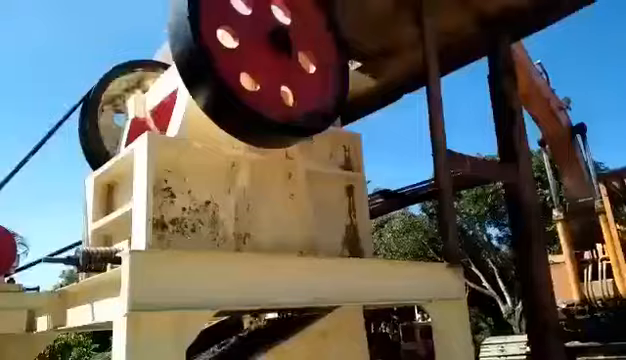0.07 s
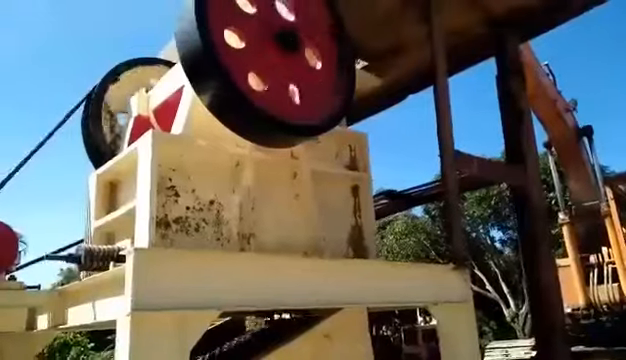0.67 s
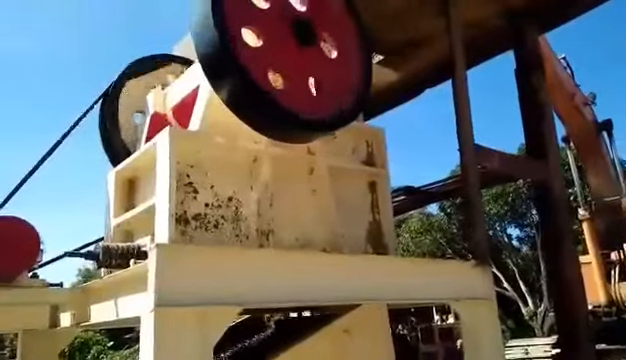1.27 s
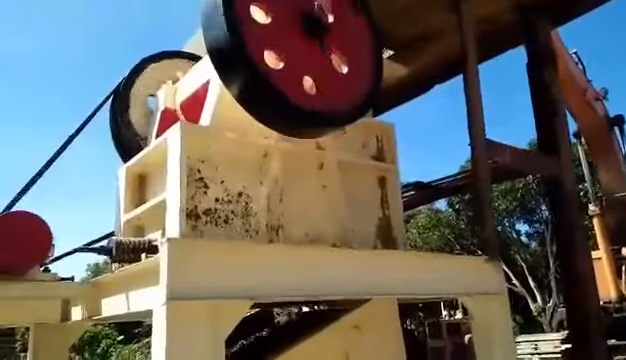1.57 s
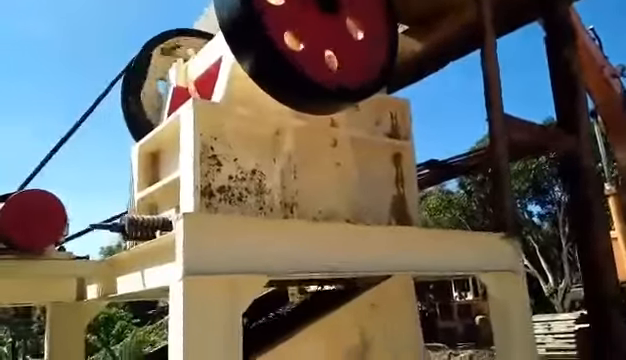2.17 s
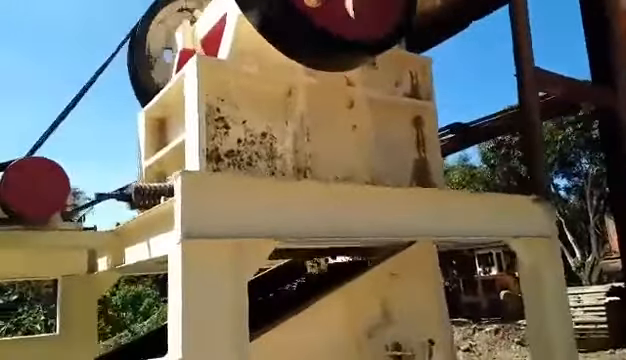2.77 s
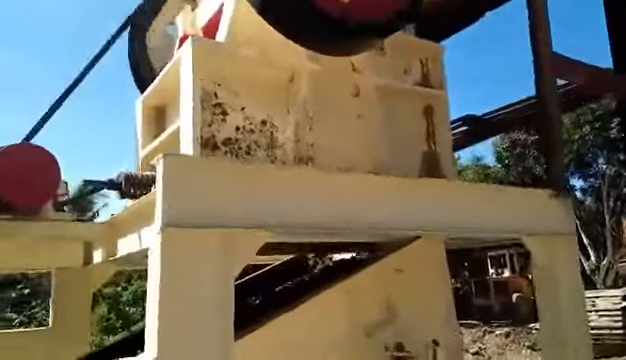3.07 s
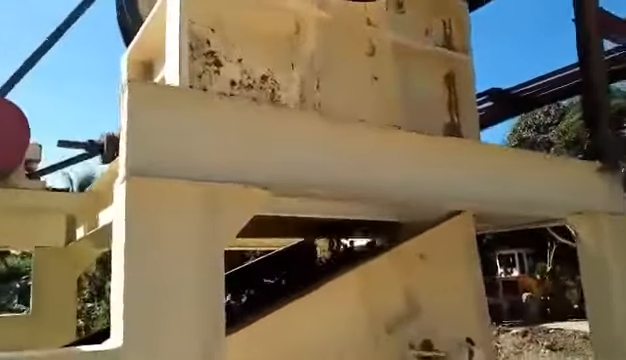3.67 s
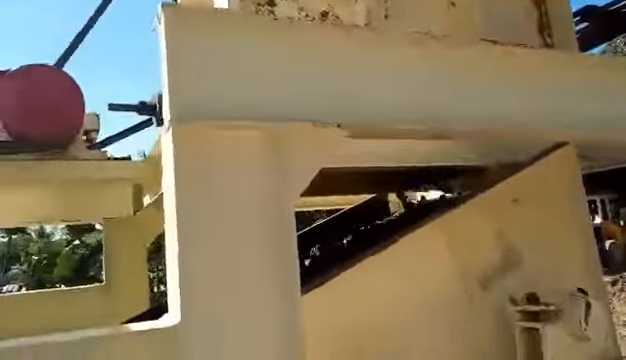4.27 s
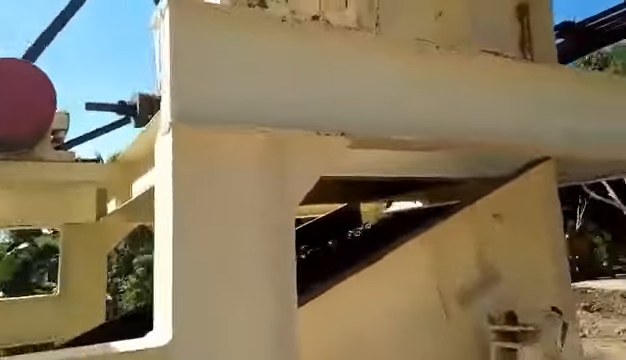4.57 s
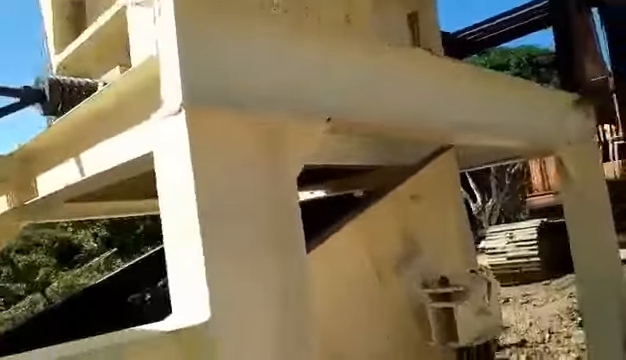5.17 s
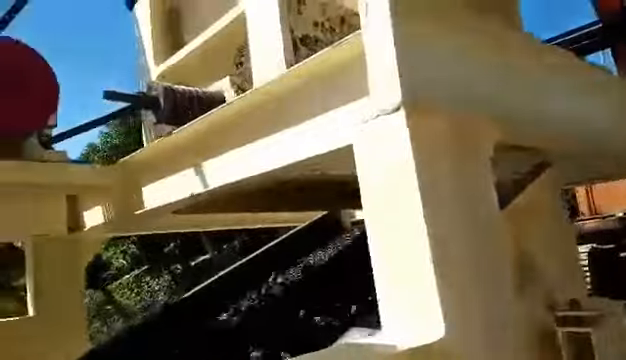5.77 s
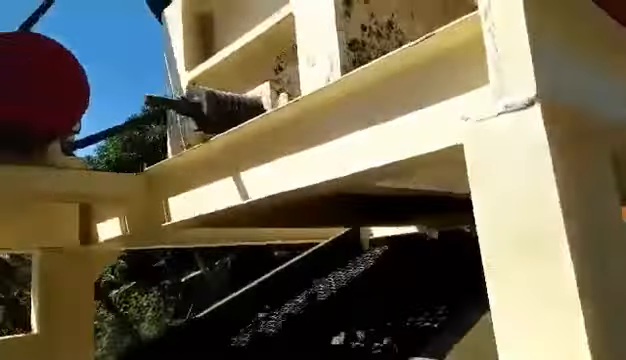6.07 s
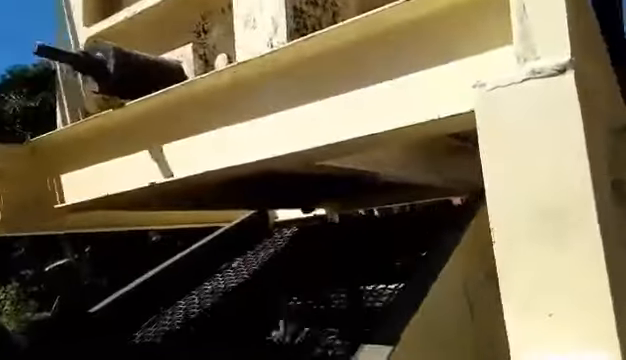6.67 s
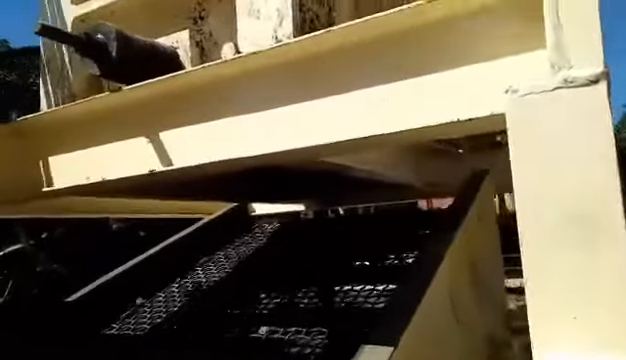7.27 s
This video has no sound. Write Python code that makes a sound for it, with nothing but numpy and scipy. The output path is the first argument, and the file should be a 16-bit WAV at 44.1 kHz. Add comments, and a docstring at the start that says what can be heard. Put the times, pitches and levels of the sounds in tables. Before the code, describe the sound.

A diesel rock crusher thuds and knocks rapidly outdoors, grinding stone as gravel hisses and clatters ever closer on a wire screen.

```python
"""A jaw crusher pounds away outdoors, driven at nineteen beats a second by what sounds like a
one-cylinder diesel. Each beat is an exhaust thud and a metallic knock that shakes the steel frame.
Rock grinds between the jaws, and gravel hisses over the wire screen below. The clatter of stones
grows as the microphone slowly approaches the screen."""
import sys
import numpy as np
from scipy import signal
from scipy.fft import rfft, irfft
from scipy.io import wavfile
from scipy.ndimage import uniform_filter1d, minimum_filter1d

SR = 44100
rng = np.random.default_rng(int(sys.argv[2]) if len(sys.argv) > 2 else 0)


def digitize_waveform(pressure):
    """Quantize a signal to 16-bit integers and store it at the path in sys.argv[1].

    Rows of a 2-D input are taken as channels; values are limited to [-1, 1].
    """
    field = np.atleast_2d(pressure).T
    bounded = np.clip(field, -1, 1)
    quanta = np.round(bounded * 32767).astype(np.int16)
    wavfile.write(sys.argv[1], SR, quanta)


N = 332073
TIME = np.arange(N) / SR
FIRST_BEAT_S, START_S = .7081, .773   # the engine is already running when the microphone opens

# Modes of the exhaust pipe and silencer: the first two boom, the last one barks.
# Each row: pitch in Hz, width in Hz, relative level in dB.
PIPE = [(87.3, 1.9, 0.5), (136.2, 2.4, -14), (160.7, 11.4, -1.5), (184, 20.3, -5.5), (237.6, 60.6, -4),
        (320, 18.3, 2), (455.3, 4.8, 4.5)]
# Engine speed. Each row: time in seconds, beats per second.
SPEED = [(.76, 19.05), (2.5, 19.01), (5.8, 19.08), (7.6, 19.05)]
BEAT = np.cumsum(np.interp(TIME, *np.transpose(SPEED)) * (TIME > FIRST_BEAT_S)) / SR   # beats so far


def exhaust(bark_gain):
    """The thud: one soft puff a beat rings the pipe and echoes off the plant."""
    # Polarity of each pipe mode, +1 or -1.
    signs = [-1, -1, -1, -1, -1, 1, -1]
    # Slaps off the plant. Each row: delay in seconds, share of the thud that returns.
    echoes = [(0.01, 0.14), (0.0143, 0.71)]
    puffs = cut(beat_clicks(0, uneven_db=.4), 532, "low", order=4)
    modes = [sign * from_db(db) * resonate(puffs, hz, width)
             for (hz, width, db), sign in zip(PIPE, signs)]
    under_frame = np.interp(TIME, (4, 6), [0, 1])   # the microphone moves in from 4 to 6 s
    boom = from_db(4 + 4.5 * under_frame) * sum(modes[:2])
    middle = sum(modes[2:-1])
    hollow = resonate(middle, 257, 66)   # the space under the frame rings; the direct thud is shaded
    body = boom + middle * from_db(-4.5 * under_frame) + from_db(-1) * under_frame * hollow
    bark = from_db(11.5) * bark_gain * modes[-1]
    thud = (from_db(-18) * body + bark) / np.std(sum(modes))
    return thud + sum(share * np.interp(TIME - delay, TIME, thud) for delay, share in echoes)


def knock():
    """About half a beat after each puff, a burr of contacts raps the block, then a rebound follows."""
    # The blows of one knock. Each row: delay after the puff in seconds, pitch in Hz, width in Hz,
    # relative level in dB.
    raps = [(.0308, 1860, 204, -0.5), (.0295, 1220, 430, -7), (.0378, 1700, 430, -6)]
    out = 0
    for delay, hz, width, db in raps:
        blows = beat_clicks(delay, uneven_db=1)
        burr = die_away(blows, decay_s=.004) * repeating_contacts(memory=.65)
        ring = resonate(resonate(blows + .09 * burr, hz, width), hz, width)
        out = out + from_db(db) * rms_one(ring)
    return out


def frame_and_jaws(rattle_gain, grind_gain):
    """Contacts, grit and ringing lumps excite the steel: the highs rattle in time, the lows grind on."""
    # Tone of the steel. Each row: frequency in Hz, spectral level in dB.
    steel_tone = [(310, -32), (520, -17), (572, 2.5), (677, 0.5), (745, 4), (819, 3), (999, 6), (1090, 2),
                  (1250, 7), (1450, 6), (1850, 6.5), (2090, -1.5), (2300, -6), (2530, -27), (3000, -23),
                  (3900, -63), (6600, -120)]
    lumps = pings(low_hz=700, high_hz=1900, per_s=170, ring_s=.014, limit=2000)
    grit = grains(2200, spread_db=1)
    steel = colour(1.1 * repeating_contacts(memory=.93) + grit, steel_tone) + .5 * lumps
    shake = shaking(delay_s=.0343, decay_s=.005, rest=.62)
    rattle = rms_one(cut(steel, 1175, "high", order=3)) * shake
    grind = rms_one(cut(steel, 900, "low", order=3))
    return rattle_gain * rattle + grind_gain * grind


def plates():
    """Now and then a stone drags on a plate, pushed along by each beat, and makes it sing."""
    # Scrapes on plates and edges. Each row: peak time in seconds, pitch in Hz, width in Hz,
    # relative level in dB, half-length in seconds.
    scrapes = [(0.814, 1350, 310, -16.5, .06), (0.824, 6330, 700, -34, 0.11),
               (1.28, 5450, 300, -42.5, 0.26), (1.676, 720, 260, -25.5, 0.11), (1.857, 870, 60, -26, .052),
               (4.473, 997, 35, -23, .04), (5.082, 1830, 60, -28.5, 0.25), (6.157, 860, 89.5, -27, 0.06),
               (6.535, 1435, 70, -25, 0.3), (6.997, 1020, 220, -23, .2), (7.14, 1440, 130, -20, .26),
               (7.303, 1960, 148, -23.5, .17)]
    rubbing = grains(4000, spread_db=2) * shaking(delay_s=.0288, decay_s=.0086, rest=.29)
    out = 0
    for peak_s, hz, width, db, half_s in scrapes:
        tone = rms_one(resonate(resonate(rubbing, hz, width), hz, 2 * width))
        out = out + from_db(db + 5.5) * swell(peak_s, half_s) * tone
    return out


def screen():
    """Gravel streams and ticks over the mesh; each landing load swells the hiss and rings the wires."""
    # Loads of gravel landing. Each row: peak time in seconds, relative level in dB,
    # half-length in seconds.
    spills = [(1.04, -34, 0.019), (2.09, -41, 0.043), (2.43, -33.5, 0.044), (3.1, -32, 0.018),
              (3.25, -33.5, 0.025), (3.516, -27.5, 0.0097), (3.694, -39, 0.02), (4.197, -38, 0.058),
              (4.367, -41, 0.02), (4.534, -32, 0.038), (4.6, -30.5, .023), (4.858, -37.5, 0.082),
              (5.193, -37, 0.046), (5.36, -34, 0.079), (5.544, -30, 0.03), (5.854, -29.5, 0.039),
              (6.067, -30, .03), (6.25, -25.5, 0.023), (6.425, -27.5, .025), (6.545, -26, 0.019),
              (6.735, -31, 0.025), (6.871, -27, 0.021), (7.034, -42, .025), (7.345, -36, .023),
              (7.52, -30, .03)]
    # The stream of gravel. Each row: time in seconds, relative level in dB.
    stream = [(0.8, -23.5), (1.5, -24.0), (1.8, -31), (2.3, -28), (2.9, -29.5), (3.9, -27.5), (4.5, -24.5),
              (5.0, -26.5), (5.75, -27.5), (6.1, -21.5), (6.6, -21), (7.5, -23)]
    # Tone of the hiss. Each row: frequency in Hz, spectral level in dB.
    hiss_tone = [(2940, -28), (5000, -17.5), (7190, -9.5), (8610, -4), (10100, -6.5), (11500, -8),
                 (13000, -15.5)]
    # Ring of the wires. Each row: pitch in Hz, width in Hz, relative level in dB.
    wire_modes = [(8650, 620, -3), (11380, 270, -3.5)]
    landings = sum(from_db(db) * swell(peak_s, half_s) for peak_s, db, half_s in spills)
    flow = from_db(curve(stream) - 2.58 + 2.15 * drift(per_s=60))
    sides = []
    for _ in range(2):
        ticks = pings(low_hz=5500, high_hz=12800, per_s=420, ring_s=.003, limit=4000)
        hiss = colour(grains(14000, spread_db=2.8) + .25 * ticks, hiss_tone)
        wires = rms_one(sum(from_db(db) * resonate(grains(2000, spread_db=6), hz, width)
                            for hz, width, db in wire_modes))
        chinks = sum(from_db(db) * pings(hz - width, hz + width / 2, per_s=24, ring_s=.01, limit=300)
                     for hz, width, db in wire_modes)
        sides.append(flow * (hiss + from_db(-7.5) * chinks) + landings * (.5 * hiss + 2 * wires))
    return spread(*sides, likeness=.35)


def deck():
    """Stones bounce on the deck under the screen in a dense, ringing clatter."""
    # Tone of the deck. Each row: frequency in Hz, spectral level in dB.
    deck_tone = [(2100, 0.5), (2350, -5), (2700, -6.5), (3300, -13), (4200, -22.5)]
    stones = pings(low_hz=2100, high_hz=4200, per_s=900, ring_s=.008, limit=7000)
    return colour(stones, deck_tone) * shaking(delay_s=.0295, decay_s=.011, rest=1.3)


def chips():
    """Small fragments click and chink on the steel, tossed by each beat."""
    # Tone of the fragments. Each row: frequency in Hz, spectral level in dB.
    chip_tone = [(2400, 6), (3000, -7), (4000, 5), (4800, 0.5), (7000, -2.5)]
    sides = []
    for _ in range(2):
        clicks = grains(7000, spread_db=2.1)
        chinks = pings(low_hz=2400, high_hz=7000, per_s=160, ring_s=.005, limit=2000)
        sides.append(colour(clicks + .3 * chinks, chip_tone))
    return spread(*sides, likeness=.52) * shaking(delay_s=.0313, decay_s=.015, rest=1)


def hopper():
    """Heavy lumps tumble in the hopper with a low rumble."""
    # Tone of the rumble. Each row: frequency in Hz, spectral level in dB.
    rumble_tone = [(20, -5), (60, -2.5), (150, -3.5), (280, 5.5), (370, -9.5), (460, 1), (540, -14.5),
                   (620, -3), (800, -72)]
    return from_db(-28.5) * colour(grains(2000, spread_db=1.5), rumble_tone)


def gas_rasp(bark_gain):
    """Gas rushing out of the pipe roughens its bark."""
    bark_hz = PIPE[-1][0]
    rush = resonate(resonate(rng.standard_normal(N), bark_hz, 91), bark_hz, 130)
    return from_db(-4.5) * bark_gain * rms_one(rush)


def beat_clicks(delay_s, uneven_db):
    """One click a beat, each of a different strength."""
    at = np.flatnonzero(np.diff(np.floor(BEAT))) + round(delay_s * SR)
    clicks = np.zeros(N + SR)
    clicks[at] = from_db(uneven_db * rng.standard_normal(len(at)))
    return clicks[:N]


def shaking(delay_s, decay_s, rest):
    """Envelope of loose parts that are thrown once a beat and settle until the next."""
    thrown = die_away(beat_clicks(delay_s, uneven_db=5), decay_s)
    return rms_one(rest + cut(thrown, 160, "low", order=1))


def repeating_contacts(memory, size=2400):
    """The same parts touch in the same order every beat; more memory makes the pattern change slower."""
    beat = BEAT.astype(int)
    pattern = rng.standard_normal((beat[-1] + 1, size))
    for k in range(1, len(pattern)):
        pattern[k] = memory * pattern[k - 1] + np.sqrt(1 - memory ** 2) * pattern[k]
    age = np.arange(N) - np.searchsorted(beat, beat)
    return pattern[beat, age % size]


def grains(per_s, spread_db):
    """Random impacts: many small ones, a few large."""
    sizes = from_db(spread_db * np.minimum(rng.exponential(1, N), 4)) * rng.choice([-1, 1], N)
    return rms_one(sizes * (rng.random(N) < per_s / SR))


def pings(low_hz, high_hz, per_s, ring_s, limit):
    """Up to `limit` stones of many sizes strike at random, each ringing briefly at its own pitch."""
    out = np.zeros(N + SR)
    age = np.arange(int(5 * ring_s * SR)) / SR
    for when, pitch, size in rng.random((limit, 3))[:int(per_s * N / SR)]:
        at, hz = int(when * N), low_hz * (high_hz / low_hz) ** pitch
        ring = np.exp(-age / ring_s) * np.sin(2 * np.pi * hz * age)
        out[at:at + len(age)] += from_db(-20 * size) * ring
    return rms_one(out[:N])


def colour(x, points):
    """Give a steady sound a spectrum that falls away steeply beyond its ends; rms 1."""
    hz, db = np.transpose(points)
    octave, known = np.log2(np.arange(N // 2 + 1) * SR / N + 1), np.log2(hz)
    beyond = np.abs(octave - np.clip(octave, known[0], known[-1]))
    return rms_one(irfft(rfft(x) * from_db(np.interp(octave, known, db) - 84 * beyond), N))


def spread(mid, side, likeness):
    """Widen the treble with an unrelated side signal; more likeness keeps it narrower."""
    width = np.sqrt((1 - likeness) / (1 + likeness))
    return mid + width * cut(side, 5570, "high", order=6) * [[1], [-1]]


def resonate(x, hz, width_hz):
    """One resonance with gain 1 at its peak."""
    return signal.lfilter(*signal.iirpeak(hz, hz / width_hz, fs=SR), x + 1e-18)


def cut(x, hz, kind, order):
    """Low-pass or high-pass filter."""
    return signal.sosfilt(signal.butter(order, hz, kind, fs=SR, output="sos"), x)


def die_away(clicks, decay_s):
    """Give each click an exponential tail."""
    return signal.lfilter([1], [1, -np.exp(-1 / (decay_s * SR))], clicks)


def swell(peak_s, half_s):
    """A bell-shaped rise and fall."""
    return np.exp(-((TIME - peak_s) / half_s) ** 2)


def drift(per_s):
    """A random wander with a spread near 1."""
    return np.interp(TIME * per_s, np.arange(2000), rng.standard_normal(2000))


def curve(rows):
    """A control's value at every sample."""
    return np.interp(TIME, *np.transpose(rows))


def from_db(db):
    return 10 ** (np.asarray(db) / 20)


def rms_one(x):
    return x / np.sqrt(np.mean(x ** 2) + 1e-20)


def scene():
    """The load drives knock, rattle and grinding; chips and deck come forward as the screen nears."""
    # How hard the jaws work. Each row: time in seconds, relative level in dB.
    load = [(0.8, -10.5), (0.98, -14), (1.5, -11), (1.85, -14), (2.12, -14.5), (2.9, -14.0), (3.6, -12),
            (4.28, -13.5), (4.5, -13), (4.75, -13.0), (5.0, -13.0), (5.45, -12.5), (6.3, -9), (7.25, -10),
            (7.5, -9.5)]
    # The microphone's way to the screen. Each row: time in seconds, nearness from 0 to 1.
    approach = [(.8, 0), (2.8, 0.08), (4.8, 0.27), (6.0, 0.61), (6.8, 0.9), (7.5, 1.0)]
    # Strength of the exhaust's bark. Each row: time in seconds, relative level in dB.
    bark = [(.8, -26.5), (1.3, -23.5), (2.5, -29.5), (4.1, -30.5), (4.8, -35), (5.3, -35), (6.6, -24),
            (7.5, -25.5)]
    load_db = curve(load) - curve(load).mean()
    near, bark_gain = curve(approach), from_db(curve(bark))
    engine = exhaust(bark_gain) + from_db(-25 + load_db) * knock()
    surge_db = .8   # the rock breaks unevenly
    rattle_gain = from_db(-19.5 + .72 * load_db + .5 * near + surge_db * drift(per_s=7))
    grind_gain = from_db(-21 + .8 * load_db + .9 * near + surge_db * drift(per_s=7))
    rock = frame_and_jaws(rattle_gain, grind_gain) + plates() + hopper()
    rasp = gas_rasp(bark_gain)
    chips_gain = from_db(-37.5 + 6 * near ** 2.5)   # rises only close by
    deck_gain = from_db(-43.5 + 19 * near ** .51)   # rises early in the approach
    return engine + rasp + rock + chips_gain * chips() + deck_gain * deck() + screen()


def record(dry):
    """The microphone opens, a quick limiter holds the peaks down, the top is cut."""
    ceiling_db, release_db_per_s, cutoff_hz = -3, 500, 13100
    x = dry * np.clip((TIME - START_S) / .0015, 0, 1)
    over_db = np.maximum(20 * np.log10(np.abs(x).max(axis=0) + 1e-9) - ceiling_db, 0)
    held_db = np.maximum.accumulate(over_db + release_db_per_s * TIME) - release_db_per_s * TIME
    x = x * from_db(uniform_filter1d(minimum_filter1d(-held_db, size=45), size=45))
    return signal.sosfilt(signal.ellip(12, .1, 80, cutoff_hz, fs=SR, output="sos"), x)


dry = scene()
out = record(dry)
digitize_waveform(out)
```